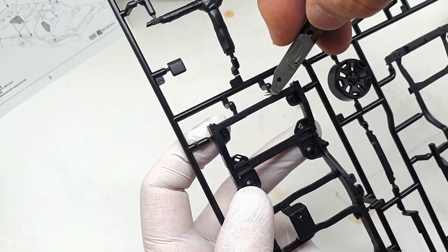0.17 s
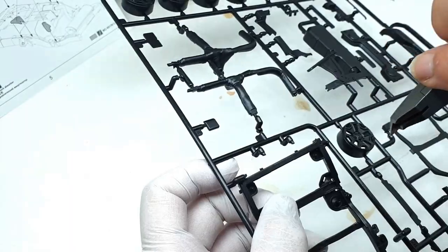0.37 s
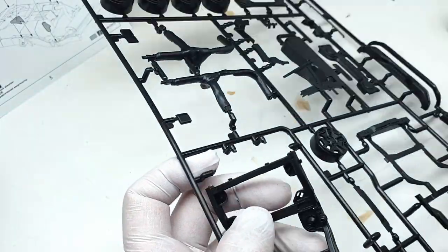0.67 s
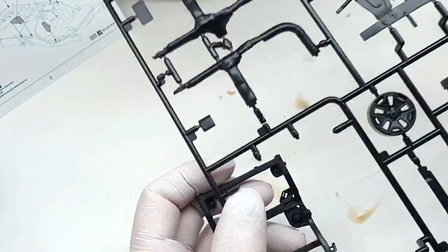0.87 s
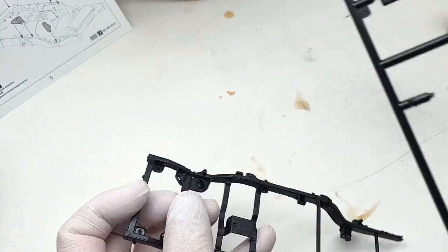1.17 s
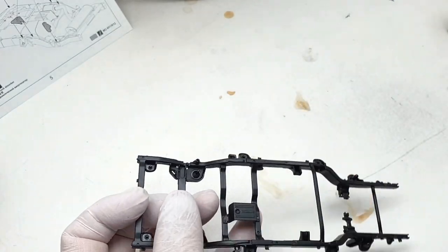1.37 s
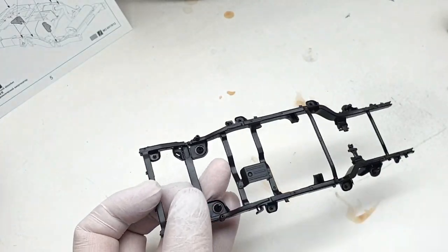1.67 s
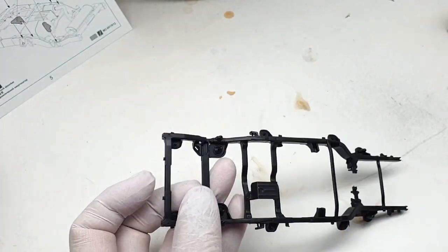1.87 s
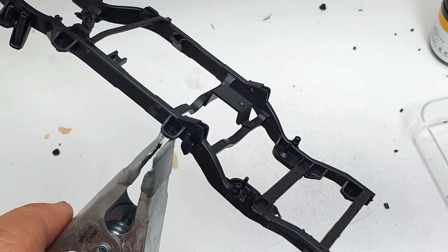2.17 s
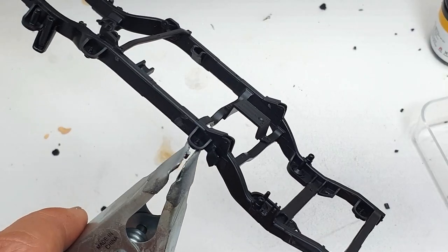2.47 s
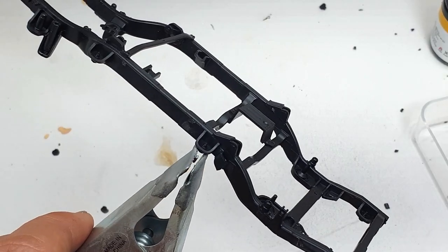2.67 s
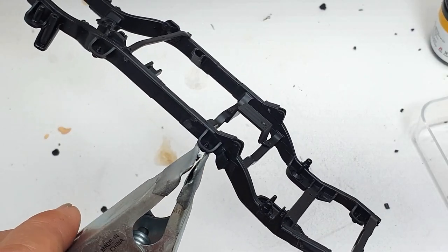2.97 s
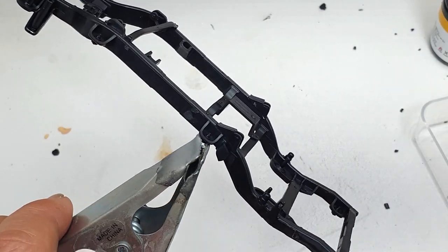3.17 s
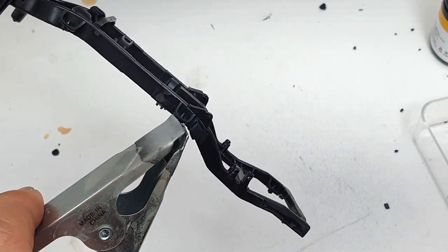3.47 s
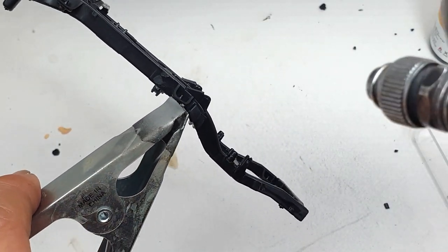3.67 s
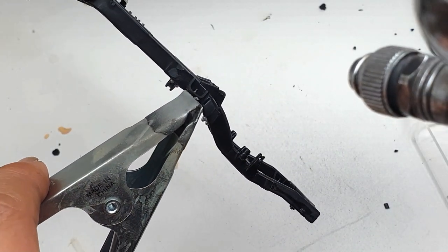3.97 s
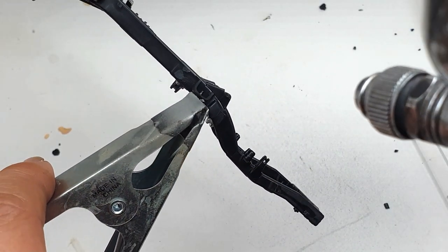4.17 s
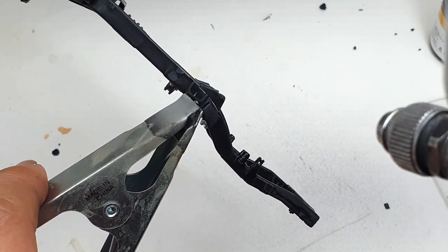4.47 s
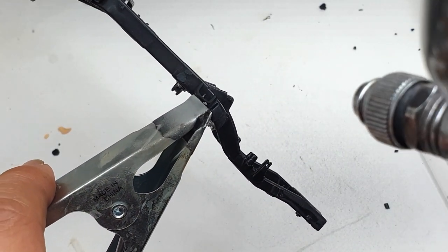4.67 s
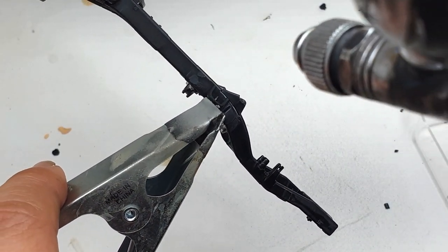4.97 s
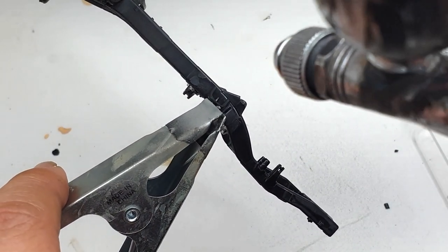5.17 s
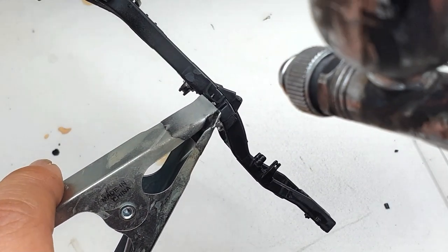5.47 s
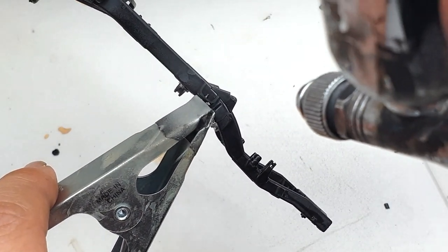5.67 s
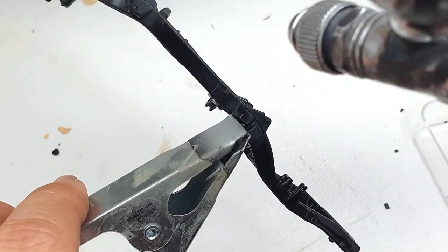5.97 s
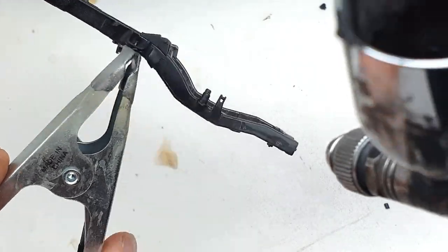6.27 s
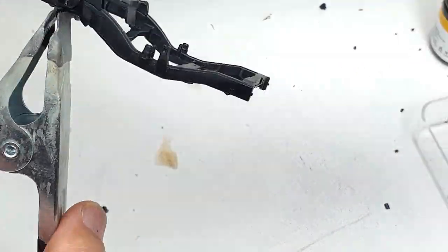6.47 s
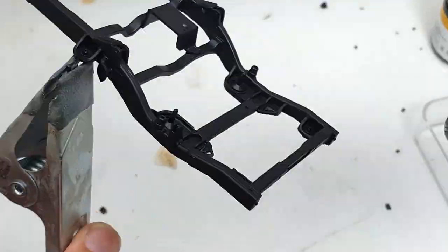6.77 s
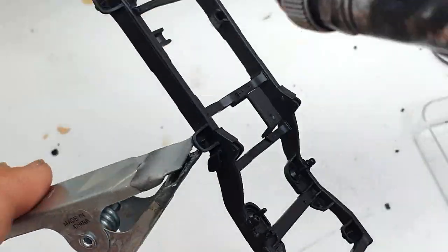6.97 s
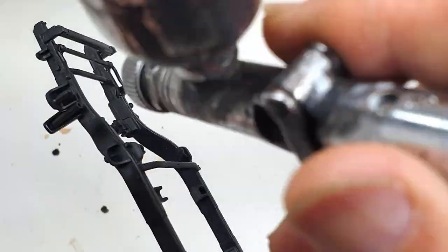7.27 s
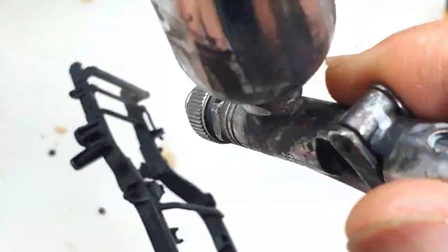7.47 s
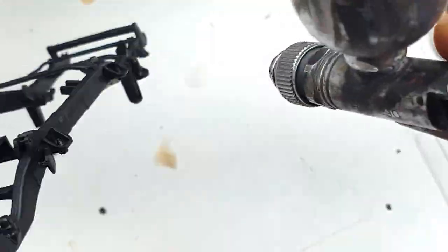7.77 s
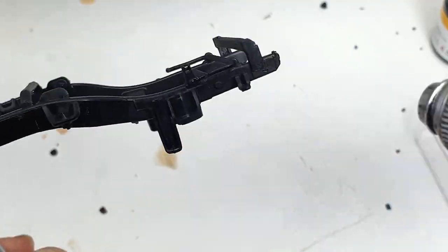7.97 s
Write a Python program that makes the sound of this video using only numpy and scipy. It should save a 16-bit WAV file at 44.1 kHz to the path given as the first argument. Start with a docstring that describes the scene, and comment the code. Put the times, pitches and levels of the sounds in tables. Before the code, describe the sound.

Close, dry handling sounds at a hobby desk: plastic cracks as it is cut, ticks and scrapes, and the sprue knocks down. After about two seconds an extractor fan suddenly hums and rumbles, and keeps running. From halfway, an airbrush adds a bright, high hiss. Toward the end the air pulses rapidly with a compressor's strokes, the jet briefly dips and gushes, and tools bump dully.

```python
"""A plastic part is snipped from its sprue with a crack, and the sprue knocks on the desk in a quiet room.
Plastic rubs and rings; shifting hands stir a low murmur. An extractor fan starts: hum, rumble, rushing air.
Then an airbrush opens: the nozzle hisses and the jet splashes on the part.
Later the compressor's piston cuts in and makes the air flutter; tools knock, the jet slips and gushes."""
import sys
import numpy as np
from scipy import signal
from scipy.fft import rfft, irfft
from scipy.io import wavfile

SR = 44100
rng = np.random.default_rng(int(sys.argv[2]) if len(sys.argv) > 2 else 0)


def wav_out(sig):
    """Save sig, one row per channel (or a flat mono array), as 16-bit PCM at SR to the path in sys.argv[1]."""
    wavfile.write(sys.argv[1], SR, np.round(np.clip(np.atleast_2d(sig).T, -1, 1) * 32767).astype(np.int16))


N = 357210
T = np.arange(N) / SR
BINS_HZ = np.arange(N // 2 + 1) * SR / N
FAN_ON_S, AIR_ON_S, PUMP_ON_S = 2.023, 3.958, 5.757

# contact noise of knocks and rubs: freq_hz, level_db
CONTACT_SPECTRUM = [(100, 5), (400, -4), (760, -0.5), (1050, -5.5), (1600, -8), (2200, -14.5), (3500, -13),
                    (6000, -17), (12000, -24)]


def airbrush(open_s=0.043, pump_hz=43.2, hiss_db=-35.5, splash_db=-47, gush_db=-56):
    """The nozzle hisses; the jet splashes on the part and slips off it; piston strokes pulse the air."""
    # nozzle hiss: freq_hz, level_db
    hiss_spectrum = [(3000, -26), (7000, -19.5), (8500, -10.5), (9600, -7), (10500, -1), (12000, 1.5),
                     (13800, 0), (15600, -5.5)]
    # jet on the part: freq_hz, level_db
    splash_spectrum = [(500, -31), (1200, -10.5), (1600, -7.5), (2200, -0.5), (3000, 0.5), (4300, -1),
                       (6000, 2), (7500, 1), (10000, 3.5), (15500, -13)]
    # eddies behind the part: freq_hz, level_db
    gush_spectrum = [(250, -23), (480, -2), (620, 0), (720, 1), (850, 4), (1050, 2), (1300, -6.5),
                     (2200, -6.5), (5000, -38)]
    # narrow spray resonances: freq_hz, width_hz, lift_db
    resonances = [(598, 52, 3.5), (1315, 34, 5.5), (1506, 90, 6), (1770, 32, 1), (1930, 140, 4.5),
                  (4220, 210, 4), (5530, 120, 1.5), (8530, 120, 4.5), (10070, 140, 6), (10860, 60, 8),
                  (10800, 33, -1), (13930, 100, 2)]
    # jet's lean: freq_hz, left_minus_right_db
    lean = [(700, 4), (2400, 1), (4400, 4), (8000, 2), (10800, 1.5), (13500, 8), (15500, 13.5)]
    # air flow set by the trigger: time_s, flow_db
    trigger = [(3.97, -1.3), (4.2, -1.1), (4.46, -0.1), (4.62, 1), (5.7, 0.83), (5.95, 0.08), (7.75, -0.4),
               (8.08, 1.5)]
    # jet slips off, whistling on the edge: start_s, away_s, whistle_db
    slips = [(6.424, 0.069, -46), (6.724, 0.024, -55), (7.174, 0.19, -49.5), (7.81, 0.025, -53)]
    # jet blows into a hollow: centre_s, half_length_s, level_db
    gushes = [(5.765, 0.066, -50), (6.145, 0.033, -50), (6.64, .04, -51), (7.666, 0.027, -56),
              (7.888, 0.041, -53), (8.073, 0.041, -48)]
    leave_s, return_s = 0.017, 0.087
    flow_db = np.interp(T, *np.transpose(trigger))
    pumping = ramp(PUMP_ON_S, .02)
    sag_db = -1.74 * pumping  # line pressure drops
    stroke = pumping * np.sin(2 * np.pi * pump_hz * T + .2 * walk(4))
    away = sum(ramp(start_s, leave_s) - ramp(start_s + away_s, return_s) for start_s, away_s, _ in slips)
    miss_db = -6.5 * away
    lift_db = peaks(resonances) + np.array([[1], [-1]]) * curve(lean) / 2
    hiss = noise(hiss_spectrum, lift_db) * undb(hiss_db + flow_db + sag_db - 2 * away + 2.5 * stroke)
    splash = noise(splash_spectrum, lift_db) * undb(splash_db + 2.2 * flow_db + miss_db + 1.7 * stroke)
    eddies = undb(gush_db + flow_db + sag_db + miss_db + walk(8.7))
    hollows = sum(undb(db) * swell(centre_s, half_s) for centre_s, half_s, db in gushes)
    gush = noise(gush_spectrum, lift_db) * np.hypot(eddies, hollows)
    buffet = noise_bands([(32, 30, -5)]) * hollows  # air thrown at the microphone
    on_edge = sum(undb(db) * swell(start_s, half_s=.011) for start_s, _, db in slips)
    whistle = noise_bands([(4800, 2000, 0)]) * on_edge
    uneven_paint = undb(.5 * walk(90))
    valve = ramp(AIR_ON_S - open_s, open_s) ** 2
    jet = (hiss + splash + gush + buffet + whistle) * uneven_paint * valve
    return reflect(jet, echo_db=-10, sway_s=0.00012)


def snaps():
    """Plastic gives way: a bright crack, and the frame rings briefly."""
    # snaps and ticks: start_s, crack_db, ring_db, crack_t60_s, rise_s, left_minus_right_db
    events = [(0.2264, -34.5, -43, .025, .001, -6), (0.2552, -19.5, -33, 0.029, 0.00058, -3),
              (.262, -36, -34, 0.025, .0005, -3.5), (0.6629, -33.5, -36, 0.016, 0.00025, -9),
              (.829, -44.5, -61, 0.023, .002, -5), (0.867, -25, -53, 0.023, 0.0032, -9),
              (0.89, -48, -54, .05, .003, -6), (1.852, -29.5, -33, 0.044, 0.0026, -5),
              (2.863, -48, -63, .03, .001, -1), (2.8832, -31, -57, 0.031, 0.0024, 0)]
    # plastic frame: freq_hz, level_db, t60_s
    frame_modes = [(1476, -6, 0.046), (1985, -5, 0.03), (2516, -4.5, 0.042), (3170, -1, 0.025),
                   (4080, -1.5, 0.037), (4700, -0.5, 0.031), (5210, 3, 0.038), (5770, 3, 0.023),
                   (7740, 2.5, 0.02), (9520, 1.5, 0.0308), (10200, -3, .05), (12100, -3, .045),
                   (11920, -12, 0.035)]
    # crack noise: freq_hz, level_db
    crack_spectrum = [(300, -38), (1500, -11), (3000, -26), (5500, -12), (8300, -10), (10000, 1),
                      (11700, 6.5), (13300, -1.5), (15500, -7.5)]
    out, t, crack = np.zeros((2, N)), T[:SR // 4], noise(crack_spectrum)
    for start_s, crack_db, ring_db, t60_s, rise_s, side_db in events:
        burst = undb(crack_db) * crack[:, int(start_s * SR):][:, :len(t)] * fade(t, t60_s)
        frame = undb(ring_db) * ring(frame_modes, t)
        add(out, start_s, (burst + frame) * np.minimum(t / rise_s, 1) * pan(side_db))
    return out


def knocks(thud_hz=115, clack_db=-4, push_s=0.00024):
    """Blunt contacts: a brief push, a short clack, hollow modes and a low thud."""
    # knocks on desk and tools: start_s, tap_db, ring_db, thud_db, decay_scale, left_minus_right_db
    events = [(0.241, -41.5, -48, -60, 0.36, -2), (0.279, -47, -50.5, -49, 0.38, -2),
              (0.682, -44, -58, -48, .6, -3), (1.8538, -33, -33, -42, 1.6, -1.5),
              (1.925, -48, -41.5, -42, 1.7, -2), (1.949, -48, -48.5, -43, 1.2, -3),
              (5.753, -24.5, -36.5, -28, 0.5, 5.5), (7.672, -36, -47, -17, 0.28, 9),
              (7.8153, -19.5, -51, -30, 0.15, 4), (8.05, -40, -43.5, -50, 0.69, 3)]
    # ring of a knock: freq_hz, level_db, base_t60_s
    desk_modes = [(493, -13, 0.053), (602, -2, 0.077), (864, 2, 0.0472), (968, -0.5, 0.064),
                  (1310, 1.5, 0.02), (1560, -9.5, .08), (1700, -12, .07), (1860, -6, 0.056),
                  (2660, -17.5, 0.056), (3666, -6, 0.058)]
    out, t, contact = np.zeros((2, N)), T[:SR // 4], noise(CONTACT_SPECTRUM)
    push = t / push_s * np.exp(1 - t / push_s)
    for start_s, tap_db, ring_db, thud_db, decay_scale, side_db in events:
        burst = np.roll(contact, -int(start_s * SR), axis=1)[:, :len(t)]
        clack = undb(clack_db) * burst * fade(t, 0.038 * decay_scale)
        body = undb(ring_db) * (ring(desk_modes, t, decay_scale) + clack)
        thud = undb(thud_db) * np.sin(2 * np.pi * thud_hz * t) * fade(t, 0.12 * decay_scale)
        add(out, start_s, (undb(tap_db) * push + body + thud) * pan(side_db))
    return out


def rubs(attack_s=0.0081, build_db=8, linger_db=-22, linger_max_t60_s=0.55):
    """Uneven friction grips, builds and lets go, ringing the sprue; a faint rustle lingers."""
    # plastic scraping on blade, glove, sprue and clamp, levels before the grip gain:
    # start_s, hold_s, t60_s, body_db, edge_db, ring_db, left_minus_right_db
    events = [(0.037, 0.033, 0.69, -52, -75, -69.5, -3.5), (0.223, 0.059, 0.022, -45, -46.5, -44.5, -5.5),
              (.47, 0.15, 0.11, -69, -72, -80, -2.5), (.594, 0.017, 0.12, -48.5, -50.5, -48.5, -7),
              (0.66, 0.016, 0.093, -51, -62, -68, 4), (0.787, .012, .24, -73, -58, -82, -5),
              (0.863, 0.0087, .09, -60, -53, -52.5, 2), (0.917, 0.04, 0.12, -59, -56.5, -48, -2),
              (1.235, .01, .7, -84, -74, -89.5, -3), (1.841, 0.035, 0.92, -52.5, -61, -62.5, -2.5),
              (2.89, .07, .35, -76, -64, -76, 1), (3.05, .27, 2.2, -76, -69, -70, 1)]
    # bright edge of a scrape: freq_hz, level_db
    edge_spectrum = [(1000, -14), (3500, -4.5), (5500, -1), (7500, -2.5), (11300, 6), (13500, 0.5),
                     (15500, -4)]
    # bending sprue: freq_hz, width_hz, lift_db
    resonances = [(1265, 62, 15.5), (1481, 120, 26), (1780, 120, 14), (2500, 400, 10), (3180, 280, 14.5),
                  (3950, 220, 11), (5400, 300, 9)]
    body = noise(CONTACT_SPECTRUM, peaks([(750, 120, 4.1)]))
    edge = noise(edge_spectrum)
    sprue = noise([(300, -26), (1200, 3), (5000, -3.5), (12000, -15.5)], peaks(resonances))
    out = np.zeros((2, N))
    for start_s, hold_s, t60_s, body_db, edge_db, ring_db, side_db in events:
        grip = ramp(start_s, attack_s) * undb(build_db * (ramp(start_s, hold_s) - 1.5))
        released_s = T - start_s - hold_s
        linger = undb(linger_db) * fade(released_s, min(linger_max_t60_s, 4 * t60_s))
        pressure = grip * np.maximum(fade(released_s, t60_s), linger)
        scrape = undb(body_db) * body + undb(edge_db) * edge + undb(ring_db) * sprue
        out += pressure * scrape * pan(side_db)
    grain_db = 2 * walk(299) + 1.26 * walk(25)
    return out * undb(grain_db)


def fan(rumble_db=-27, air_db=-54.5):
    """Motor hum, duct rumble and rushing air; the hum wavers once the pump runs."""
    # motor lines: freq_hz, rms_db
    motor_lines = [(59.3, -52.5), (118.6, -32), (158, -41.5), (207.5, -55), (239.6, -34), (269.5, -48)]
    # duct rumble: freq_hz, level_db
    rumble_spectrum = [(20, -36), (40, -21.5), (62, -13), (100, -3.5), (135, -3), (158, 3), (195, -7),
                       (240, -7.5), (280, -14), (325, -16.5), (400, -27.5), (500, -42.5), (900, -66.5)]
    # rushing air: freq_hz, level_db
    air_spectrum = [(200, -6), (420, -0.5), (520, -2), (630, -2.5), (800, -9), (1200, -13), (1550, -12),
                    (2300, -13.5), (3200, -18), (4400, -15.5), (7500, -17.5), (9500, -29), (12000, -32.5),
                    (15500, -56)]
    # housing resonances: freq_hz, width_hz, lift_db
    housing = [(423, 30, 0), (597, 48, 5), (765, 62, 3.5), (1470, 34, 4.5), (2150, 200, 0)]
    # faint hollow tones that swell once: freq_hz, width_hz, level_db
    hollow_tones = [(997, 42, -60), (1530, 170, -63)]
    waver_rad = 0.019 + .8 * ramp(PUMP_ON_S, .05)
    hum = np.zeros(N)
    for hz, rms_db in motor_lines:
        phase_rad = rng.uniform(0, 2 * np.pi) + waver_rad * walk(10.4)
        hum += undb(rms_db) * np.sqrt(2) * np.sin(2 * np.pi * hz * T + phase_rad)
    rumble = undb(rumble_db + 0.72 * walk(4.7)) * noise(rumble_spectrum)
    air = undb(air_db + 0.21 * walk(8)) * noise(air_spectrum, peaks(housing))
    air = reflect(air, echo_db=-12, sway_s=.00003)
    hollow = noise_bands(hollow_tones) * swell(centre_s=3.495, half_s=0.15)
    return (hum + rumble + air + hollow) * pan(side_db=4) * ramp(FAN_ON_S, 0.00054)


def hands():
    """Each shift of the hands stirs the desk's low resonances."""
    # hand shifts: centre_s, half_length_s, level_db
    shifts = [(.12, .07, -53), (0.677, .037, -53.5), (1.08, .066, -57.5), (1.656, .09, -63),
              (1.876, 0.024, -43)]
    # desk resonances: freq_hz, width_hz, level_db
    murmur = [(84.3, 44, -3.5), (154, 66, -4.5), (205.6, 28.4, -3.5)]
    return noise_bands(murmur) * sum(undb(db) * swell(centre_s, half_s) for centre_s, half_s, db in shifts)


def room_tone(level_db=-53.5, wander_db=3):
    """Low room murmur, wandering in level."""
    # room noise: freq_hz, level_db
    spectrum = [(15, -59.5), (25, -27), (32, -23), (44, -18), (66, 3.5), (75, -7.5), (107, -19.5),
                (209, -23.5), (267, -38), (895, -49), (1450, -46), (1570, -46), (7100, -65.5),
                (11200, -49.5), (15500, -67.5)]
    return noise(spectrum) * undb(level_db + wander_db * walk(3.1))


def walls(x, wet_db=-21, t60_s=0.082):
    """Close walls add a short diffuse tail."""
    t = T[:SR // 2]
    tail = rng.standard_normal((2, len(t))) * fade(t, t60_s) * (t > .004)
    tail /= np.sqrt(np.sum(tail ** 2, axis=1, keepdims=True))
    return x + undb(wet_db) * signal.fftconvolve(x, tail, axes=1)[:, :N]


def reflect(x, echo_db, sway_s, count=5):
    """Weak echoes off nearby surfaces; delays drift as the hands move, rippling the colour."""
    drift_s, out = sway_s * walk(0.96), x.copy()
    for channel in range(2):
        for lag_s, share in zip(rng.uniform(.001, .012, count), rng.uniform(-1, 1, count)):
            position = (T - lag_s - share * drift_s) * SR
            out[channel] += undb(echo_db) * np.interp(position, np.arange(N), x[channel])
    return out


def ring(modes, t, decay_scale=1):
    """Damped modes; left and right phases part with frequency."""
    phases = rng.uniform(0, 2 * np.pi, (len(modes), 2, 1))
    out = 0
    for (hz, db, t60_s), phase in zip(modes, phases):
        phase_rad = phase[0] + phase * min(hz / 6000, 1)
        out += undb(db) * fade(t, t60_s * decay_scale) * np.sin(2 * np.pi * hz * t + phase_rad)
    return out / np.sqrt(sum(undb(db) ** 2 for _, db, _ in modes) / 2)


def noise(spectrum, lift_db=0):
    """Coloured stereo noise, alike in the bass, diffuse in the treble."""
    # likeness of the channels: freq_hz, correlation
    likeness = [(100, .995), (300, .98), (650, .72), (1400, .25), (3000, .15), (7000, 0)]
    mid, side = rfft(rng.standard_normal((2, N)))
    alike = curve(likeness)
    stereo = mid * np.sqrt(1 + alike) + np.array([[1], [-1]]) * side * np.sqrt(1 - alike)
    return unit(irfft(stereo * undb(curve(spectrum) + lift_db), N))


def noise_bands(bands):
    """Sum of noise bands: freq_hz, width_hz, level_db."""
    out = np.zeros(N)
    for hz, width_hz, db in bands:
        band = rfft(rng.standard_normal(N)) / (1 + (2 * (BINS_HZ - hz) / width_hz) ** 4)
        out += undb(db) * unit(irfft(band, N))
    return out


def peaks(resonances):
    """Lift in dB per bin from resonances: freq_hz, width_hz, lift_db."""
    return sum(db / (1 + (2 * (BINS_HZ - hz) / width_hz) ** 2) for hz, width_hz, db in resonances)


def curve(points):
    """Join freq_hz, value points on a log-frequency axis."""
    hz, value = np.transpose(points)
    return np.interp(np.log(np.maximum(BINS_HZ, 1)), np.log(hz), value)


def walk(rate_hz):
    """Smooth random drift, spread 1."""
    return unit(irfft(rfft(rng.standard_normal(N)) * np.exp(-(BINS_HZ / rate_hz) ** 2), N))


def ramp(start_s, rise_s):
    return np.clip((T - start_s) / rise_s, 0, 1)


def swell(centre_s, half_s):
    return np.exp(-((T - centre_s) / half_s) ** 2)


def fade(t, t60_s):
    return np.exp(-np.log(1000) * np.maximum(t, 0) / max(t60_s, 1e-3))


def undb(db):
    return 10 ** (np.asarray(db) / 20)


def unit(x):
    """Scale the channel mean to rms 1."""
    return x / np.std(np.atleast_2d(x).mean(axis=0))


def pan(side_db):
    """Channel gains for a left minus right level."""
    gains = undb(np.array([[1], [-1]]) * side_db / 2)
    return gains / gains.mean(axis=0)


def add(out, start_s, sound):
    start = int(start_s * SR)
    out[:, start:start + sound.shape[1]] += sound[:, :N - start]


def scene():
    """Handling sounds over the room's murmur, then fan and airbrush."""
    background = room_tone()
    handling = walls(snaps() + knocks() + rubs())
    return handling + (background + hands()) * pan(side_db=-2.5) + fan() + airbrush()


def record(dry, top_hz=15800):
    """Steep low-pass."""
    return signal.sosfilt(signal.ellip(12, .2, 80, top_hz, fs=SR, output="sos"), dry)


dry = scene()
out = record(dry)
wav_out(out)
```